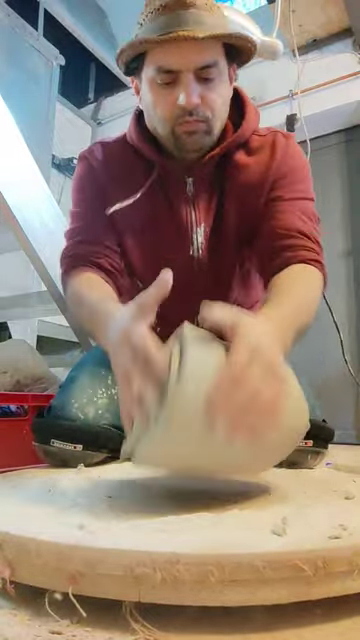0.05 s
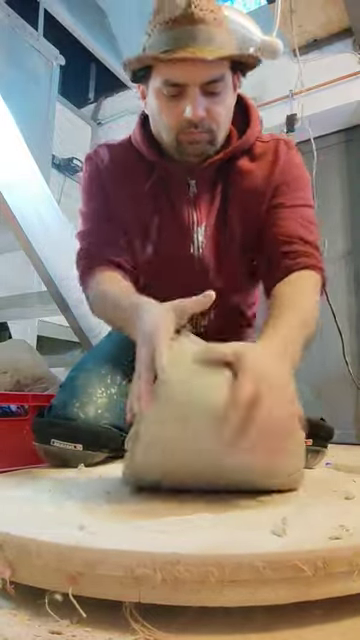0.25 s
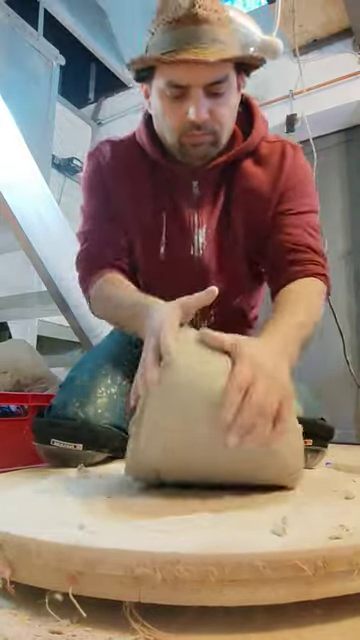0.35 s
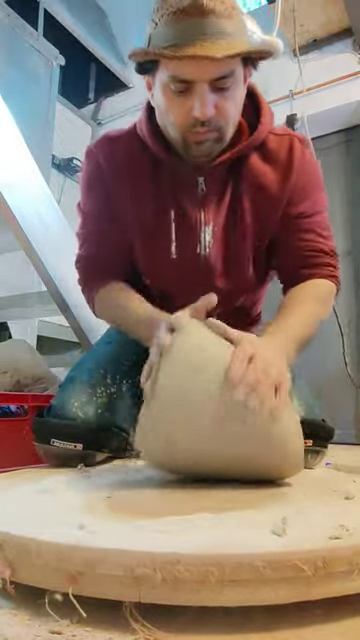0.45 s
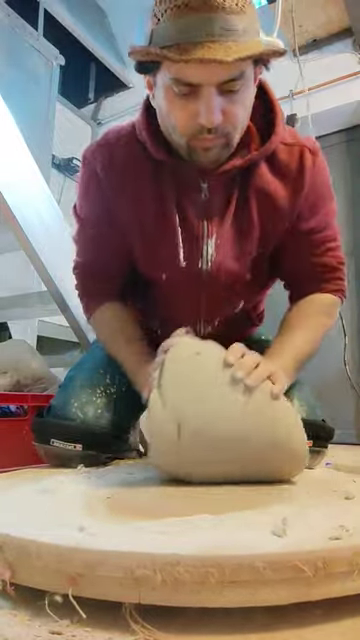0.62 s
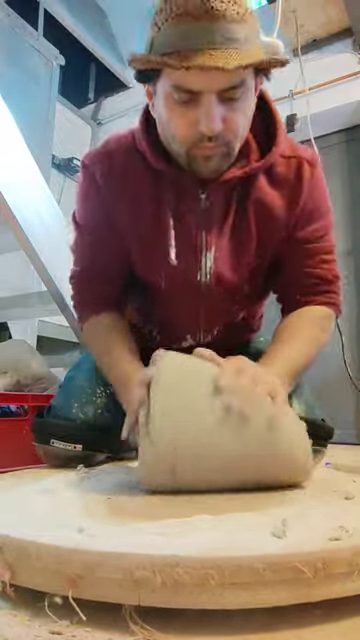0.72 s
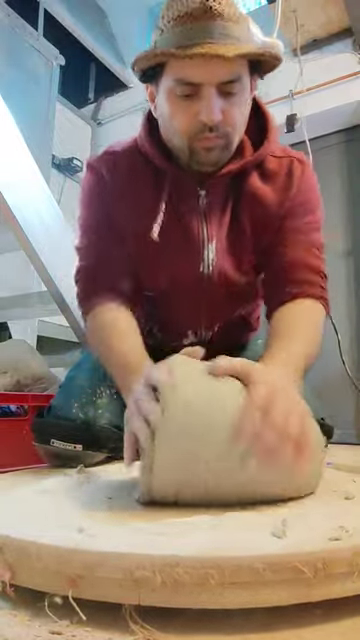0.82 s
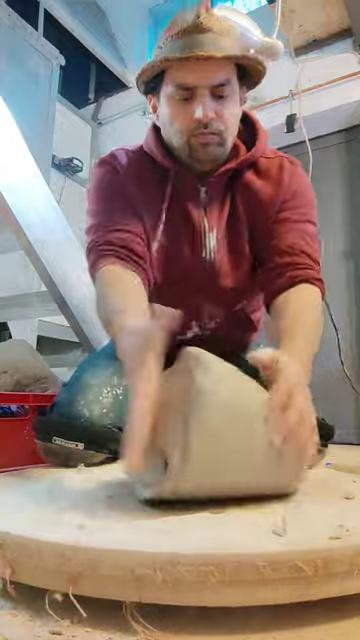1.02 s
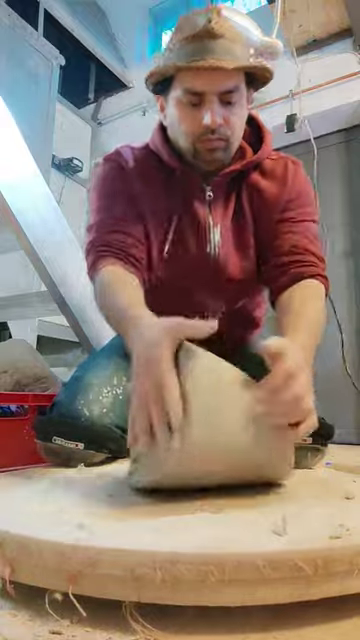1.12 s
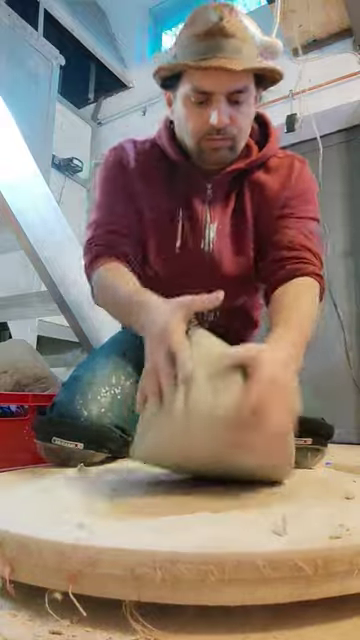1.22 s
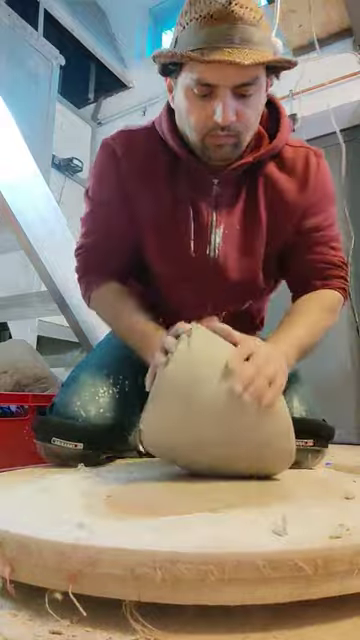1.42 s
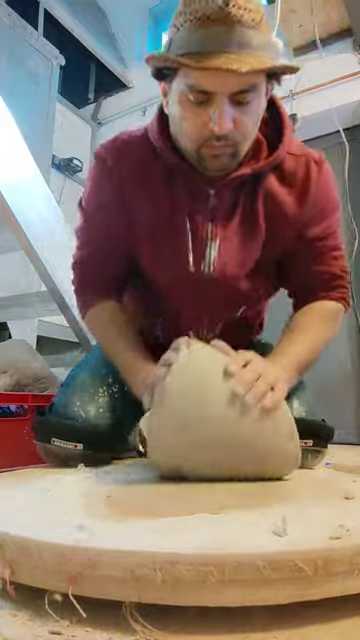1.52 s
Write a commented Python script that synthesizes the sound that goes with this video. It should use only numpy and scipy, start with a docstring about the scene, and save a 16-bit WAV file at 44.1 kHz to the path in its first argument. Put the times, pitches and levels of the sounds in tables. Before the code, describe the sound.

One hard smack and boom of clay landing on wood in a small workshop.

```python
"""A block of wet clay slapped onto a round wooden board, close to the microphone in a small workshop.
One edge smacks down, the full weight follows, and the board booms until the clay smothers it.
The room rings on. Hands pat and rub the clay as it is tipped up again, also at close range.
Behind them are the steady hum of an electric appliance and the still air of the room."""
import sys
import numpy as np
from scipy import signal
from scipy.fft import rfft, irfft
from scipy.io import wavfile
from scipy.ndimage import uniform_filter1d

SR = 44100
rng = np.random.default_rng(int(sys.argv[2]) if len(sys.argv) > 2 else 0)


def bounce(signal):
    """Save signal as a 16-bit WAV file at the path given by the first command-line argument."""
    frames = np.transpose(np.atleast_2d(signal))
    limited = np.clip(frames, -1, 1)
    pcm = np.round(limited * 32767).astype(np.int16)
    wavfile.write(sys.argv[1], SR, pcm)


N = 68355

# The clay lands, edge first. Each row: start in seconds, level into the board in dB,
# level of the smack in dB, softness of the contact in seconds.
BLOWS = [(0.2064, -1.5, 2, 0.00011), (0.2229, -7.5, -18.5, 0.00085)]
# Where the smack and the room tone sit in the stereo picture. Each row: Hz, left minus right in dB.
BALANCE = [(100, 12), (700, -10.5), (1300, -8.5), (2400, -2.5), (4400, -3), (8000, 6.5), (14000, -1)]
NEAR_SHARED_HZ, ROOM_SHARED_HZ = 2920, 300  # below these, near and room noise are alike on both sides


def board():
    """At each blow the board booms and the clay cracks; the settled clay then smothers the ringing."""
    # Low booming modes of the loaded board, then three brief high resonances of the clay's crack.
    # Each row: Hz, level in dB, t60 in seconds, left minus right in dB.
    modes = [(135, -38.5, 0.056, -5), (296.4, -10, 0.22, -3), (358.5, -22.5, 0.24, -2.5),
             (582, -33, 0.078, 22), (755.5, -18.5, 0.11, -4.5), (810, -21.5, 0.058, -3),
             (1051, -24, 0.083, 4), (1080, -44, 0.013, 11), (1690, -31.5, 0.07, 5), (2760, -20, 0.014, -3),
             (3150, -20.5, 0.01, 2), (3550, -17.5, 0.015, -6.5)]
    out = np.zeros((2, N))
    for start, db, _, soft in BLOWS:
        contact = undb(db) * (1 - np.exp(-since(start) / soft))
        for hz, mode_db, t60, pan_db in modes:
            out += pan(pan_db) * undb(mode_db) * contact * ring(start, hz, t60)
    settled_s, smother_t60_s = .238, 0.026
    return out * np.exp(-np.log(1000) * since(settled_s) / smother_t60_s)


def thud():
    """One slow swing of the board as the full weight pushes it down."""
    middle_s, hz = .2235, 87
    swing = np.sin(2 * np.pi * hz * (np.arange(N) / SR - middle_s))
    return pan(-2) * undb(-20) * swing * swell(middle_s, half_length=0.0046)


def smack():
    """Air squeezed from under the clay cracks and squishes; the flattening face adds a duller squelch."""
    # Colour of the escaping air. Each row: Hz, relative level in dB.
    spectrum = [(300, -6), (700, 1), (1350, -18), (1800, -0.5), (2250, -12), (2800, 2), (3600, 3.5),
                (4400, -11.5), (5600, -6), (6600, 2), (7700, 2), (9000, -15.5), (14000, -14.5)]
    treble_left_db = 2 * (bins() > 4500)
    colour = undb(curve(spectrum)) * pan(curve(BALANCE) + treble_left_db)
    squelch = pan(-8) * undb(-28.5) * touch(hz=760, octaves=2) * swell(.223, half_length=0.0192)
    smacks = np.zeros((2, N))
    for start, _, db, _ in BLOWS:
        crack = undb(-12.5) * fade(start, t60=0.013)
        squish = undb(-27) * fade(start, t60=0.041)
        gap_closing = 1 - np.exp(-since(start) / 0.00041)
        smacks += undb(db) * noise(colour, NEAR_SHARED_HZ) * (crack + squish) * gap_closing
    return squelch + smacks


def pats():
    """Fingers and palms pat the damp clay: a click, then a short burst of noise."""
    # Each row: start in seconds, level in dB, centre in Hz, width in octaves, t60 in seconds,
    # left minus right in dB.
    contacts = [(.070, -39, 964, 0.34, 0.024, -6), (0.322, -37, 1983, 0.059, 0.012, -3),
                (.3378, -30, 5620, 0.41, 0.012, 2.5), (.742, -45.5, 62, .4, 0.06, -2),
                (0.97, -48, 2180, 2.1, 0.017, 0), (0.986, -45.5, 7900, 0.13, 0.024, 15),
                (1.048, -50.5, 5000, 0.27, .02, 3), (1.127, -50.5, 3700, 0.33, 0.017, -4),
                (1.139, -52.5, 1050, 0.45, 0.013, -11), (1.2834, -40, 786, 1.2, 0.011, -3.5),
                (1.2841, -36.5, 1950, 0.26, 0.014, 0.5), (1.285, -38.5, 3100, 0.3, 0.014, -3),
                (1.3, -45.5, 2500, 1.3, 0.038, 0), (1.311, -48, 3000, 1.3, .025, -10)]
    out = np.zeros((2, N))
    for start, db, hz, octaves, t60, pan_db in contacts:
        click = undb(-1.5) * snap(start, hz, octaves)
        burst = touch(hz, octaves) * fade(start, t60)
        out += pan(pan_db) * undb(db) * (click + burst)
    return out


def rubs():
    """Skin, sleeves and clay slide in grainy strokes that swell and fade."""
    # Each row: middle and half-length in seconds, level in dB, centre in Hz, width in octaves,
    # left minus right in dB.
    strokes = [(.01, 0.11, -52.5, 500, 1.12, -7), (0.052, 0.13, -55, 3070, 1.44, 3),
               (0.178, 0.091, -57.5, 3440, 1.5, 4), (0.872, 0.096, -54, 704, 1.22, -4),
               (.91, 0.19, -62.5, 4840, 1.7, 3.5), (0.978, 0.048, -53, 2960, 1.1, 0.5),
               (1.037, 0.093, -61, 5100, 1.3, 4), (1.13, 0.053, -56, 3600, 2.9, 5),
               (1.192, 0.066, -58, 4300, 1.9, 4.5), (1.299, 0.041, -56.5, 5560, 0.56, 7)]
    out = np.zeros((2, N))
    for middle, half_length, db, hz, octaves, pan_db in strokes:
        grain_db = 2 * walk(seconds=0.0053)
        out += pan(pan_db) * undb(db + grain_db) * touch(hz, octaves) * swell(middle, half_length)
    return out


def touch(hz, octaves):
    """A band of contact noise from the damp clay."""
    # Colour of the handling. Each row: Hz, relative level in dB.
    spectrum = [(100, 24), (2500, -2), (5500, -1.5), (7800, 6.5), (9500, -4.5), (14000, -1.5)]
    band = np.exp(-.5 * (np.log2(bins() / hz) / octaves) ** 2)
    return noise(band * undb(curve(spectrum)), NEAR_SHARED_HZ)


def snap(start, hz, octaves):
    """The click of a contact: the wider its band, the shorter it is."""
    return np.cos(2 * np.pi * hz * (np.arange(N) / SR - start)) * swell(start, .5 / (hz * octaves))


def reverberation(near):
    """The workshop returns dense early reflections and a diffuse tail, different at each side."""
    # Colour of the reflections. Each row: Hz, gain in dB.
    spectrum = [(60, -16), (200, 2), (300, -20), (480, -3.5), (760, -10), (1100, -7.5), (1500, -7.5),
                (2300, -4.5), (3200, -9.5), (4800, -3.5), (7000, -12), (9000, -3), (14000, -9.5)]
    delay_s = .003
    early = undb(2) * fade(delay_s, t60=0.064)
    tail = fade(delay_s, t60=0.61)
    envelope = (tail + early) / np.sqrt(np.sum(tail ** 2))
    response = tint(noise(1, ROOM_SHARED_HZ) * envelope, undb(curve(spectrum)))
    return signal.fftconvolve(near, response, axes=1)[:, :N]


def standing_waves():
    """The slap builds up low room modes that outlast the board, in the centre of the picture."""
    # Each row: Hz, level in dB, t60 in seconds, build-up in seconds.
    modes = [(33.7, -39.5, 1, .03), (138.8, -31.5, 0.4, 0.037), (178, -42, .28, 0.1),
             (229.2, -29, 0.63, 0.02), (253.1, -31.5, 0.67, 0.07), (286, -26.5, 0.6, 0.077),
             (301, -17.5, 0.5, 0.067)]
    start = BLOWS[0][0]
    out = np.zeros(N)
    for hz, db, t60, build in modes:
        rise = 1 - np.exp(-(since(start) / build) ** 2)
        out += undb(db) * ring(start, hz, t60) * rise
    return out


def lingering_ring():
    """A low ring is already dying away in the room before the clay lands."""
    return undb(-46) * ring(start=0, hz=293.3, t60=0.96)


def appliance():
    """Mains hum and a faint wavering motor whine in the background."""
    # Each entry: level in dB of one harmonic of the hum, from the fundamental up.
    harmonics_db = [-60, -45, -70.5, -48, -82, -74, -68]
    # Tones of the motor. Each row: Hz, level in dB.
    motor_tones = [(75, -66), (350, -66), (1567, -67), (1696, -74)]
    hum_hz = 100
    turn = 2 * np.pi * np.arange(N) / SR
    hum = sum(undb(db - 0.63 * walk(0.033)) * np.cos(order * hum_hz * turn)
              for order, db in enumerate(harmonics_db, 1))
    whine = sum(undb(db + walk(0.15)) * np.cos(hz * turn + 0.83 * walk(0.18)) for hz, db in motor_tones)
    return np.sqrt(2) * (hum + whine) * pan(0.33)


def room_tone():
    """The still air of the workshop, a soft steady noise around the microphone."""
    # Each row: Hz, relative level in dB.
    spectrum = [(25, -3), (110, -8), (190, -7.5), (350, -4), (520, -13.5), (700, -14), (950, -21),
                (1350, -21), (1650, -12), (2300, -19), (3500, -24), (4700, -20), (6000, -24), (7800, -25.5),
                (9500, -37), (14000, -34)]
    return undb(-53.5) * noise(undb(curve(spectrum)) * pan(curve(BALANCE)), ROOM_SHARED_HZ)


def undb(db):
    """Decibels to gain."""
    return 10 ** (np.asarray(db) / 20)


def pan(db):
    """Left and right gains for a level difference, left minus right."""
    return undb(np.array([[.5], [-.5]]) * db)


def since(start):
    """Seconds since a moment; zero before it."""
    return np.maximum(np.arange(N) / SR - start, 0)


def fade(start, t60):
    """Sudden start and exponential decay, 60 dB in t60 seconds."""
    age = since(start)
    return (age > 0) * np.exp(-np.log(1000) * age / t60)


def swell(middle, half_length):
    """A smooth rise and fall, 17 dB down at half_length seconds either side of the middle."""
    return np.exp(-2 * ((np.arange(N) / SR - middle) / half_length) ** 2)


def ring(start, hz, t60):
    """One struck mode."""
    return -np.cos(2 * np.pi * hz * since(start)) * fade(start, t60)


def bins():
    """Frequencies of the spectrum in Hz."""
    return np.maximum(np.arange(N // 2 + 1) * SR / N, 1)


def curve(points):
    """(Hz, dB) points joined on a log-frequency axis."""
    hz, db = np.array(points, float).T
    return np.interp(np.log(bins()), np.log(hz), db)


def tint(x, gain):
    """Filter by a gain for each frequency."""
    return irfft(rfft(x) * gain, N)


def noise(gain, shared_hz):
    """Coloured stereo noise of rms 1; the two sides move together below shared_hz."""
    mid, side = rfft(rng.standard_normal((2, N)))
    apart = 1 / (1 + (shared_hz / bins()) ** 4)
    left_right = (mid + apart * side * np.array([[1], [-1]])) / np.sqrt(1 + apart ** 2)
    x = irfft(left_right * gain, N)
    return x / x.std()


def walk(seconds):
    """A random drift of spread 1, smoothed over the given time."""
    size = max(int(seconds * SR), 1)
    x = uniform_filter1d(uniform_filter1d(rng.standard_normal(N), size), size)
    return x / x.std()


def scene():
    """Clay, board and hands up close, the workshop ringing around them, hum and room tone behind."""
    near = board() + thud() + smack() + pats() + rubs()
    air = room_tone()
    return near + reverberation(near) + standing_waves() + lingering_ring() + appliance() + air


def record(dry):
    """The recorder cuts the top of the treble steeply."""
    top_hz = 14400
    return signal.sosfilt(signal.ellip(8, .2, 80, top_hz, fs=SR, output="sos"), dry)


dry = scene()
out = record(dry)
bounce(out)
```